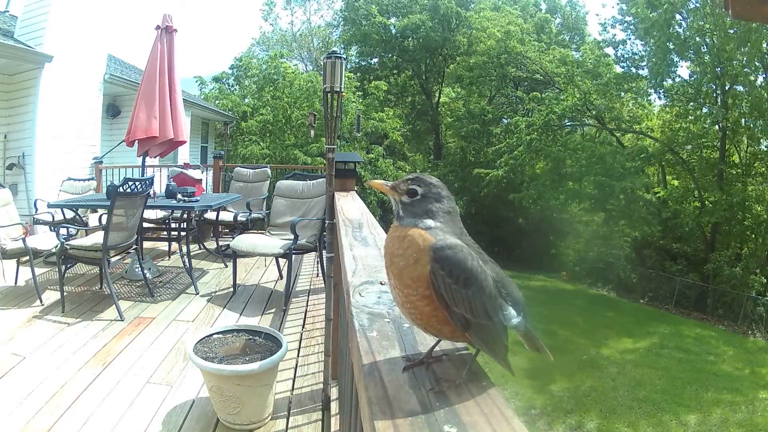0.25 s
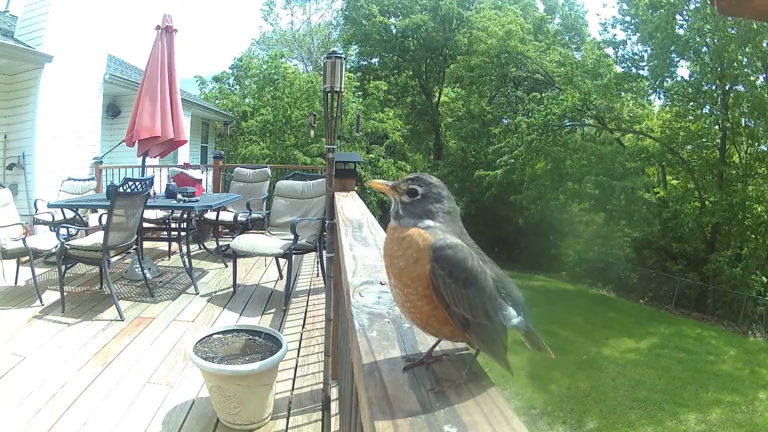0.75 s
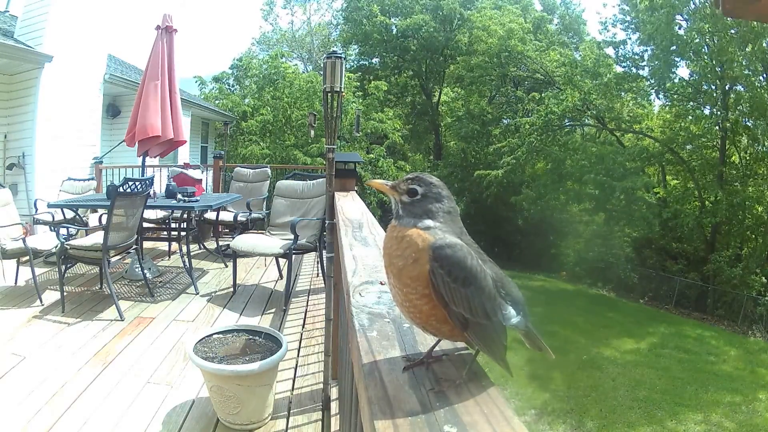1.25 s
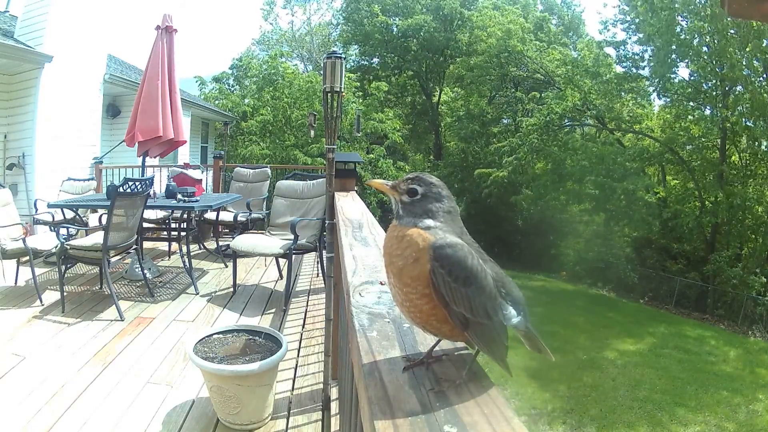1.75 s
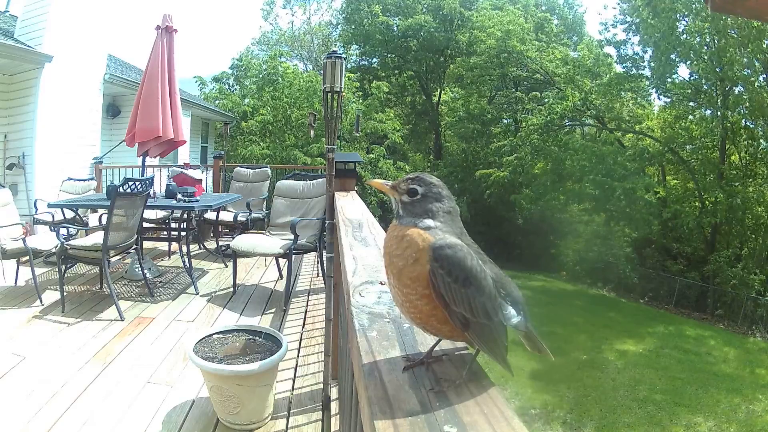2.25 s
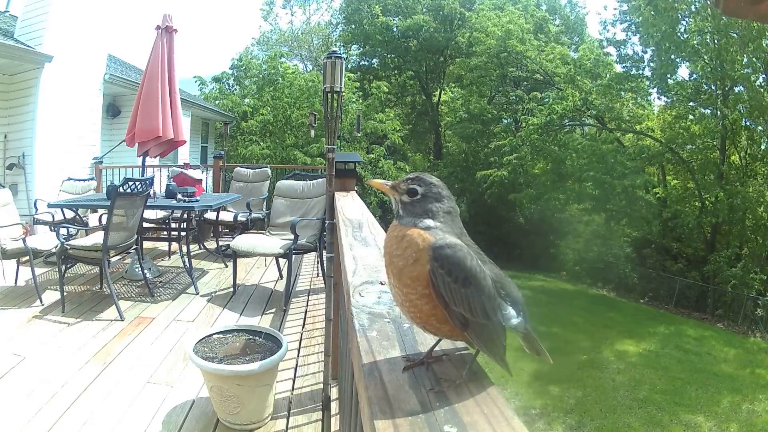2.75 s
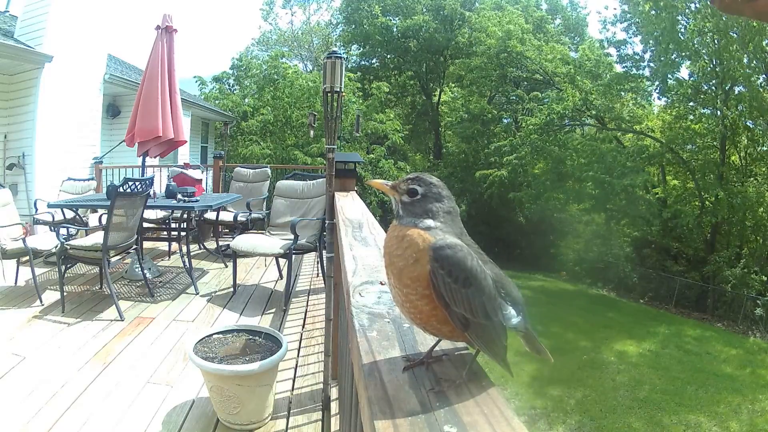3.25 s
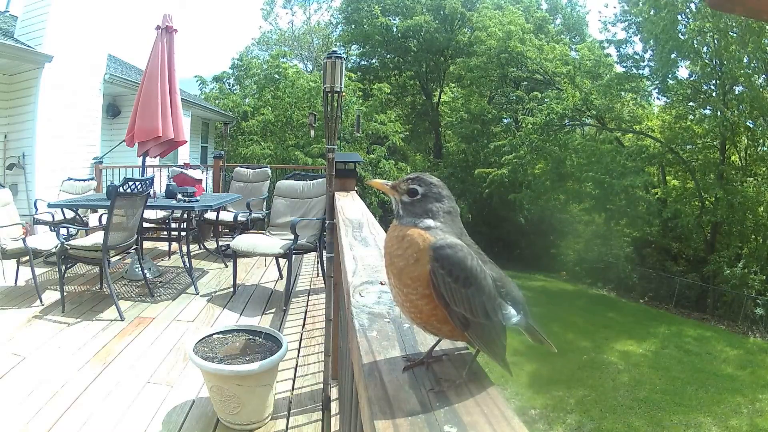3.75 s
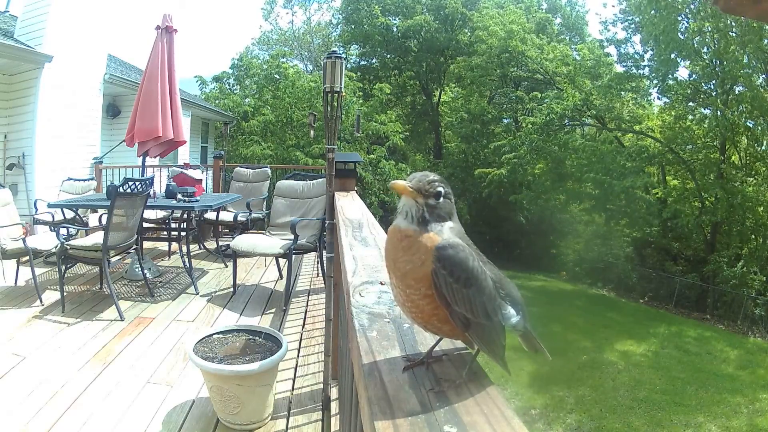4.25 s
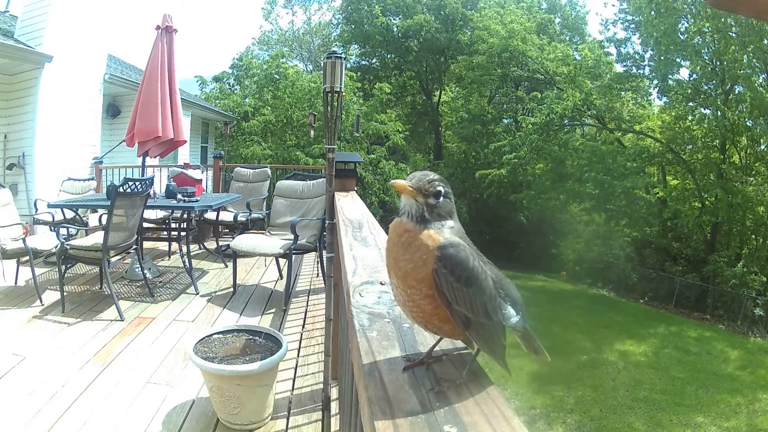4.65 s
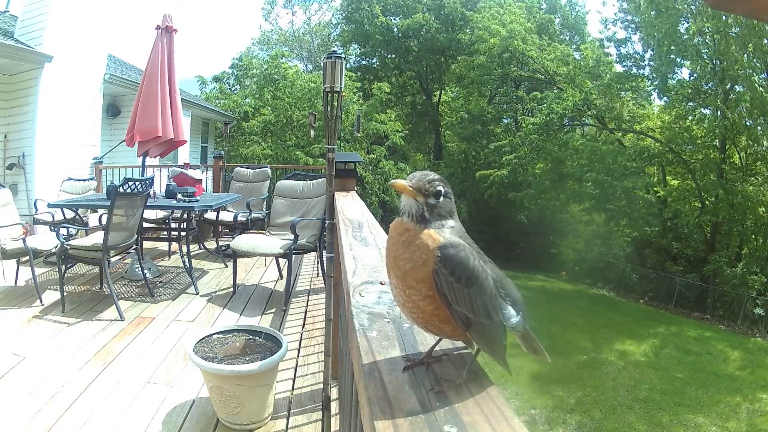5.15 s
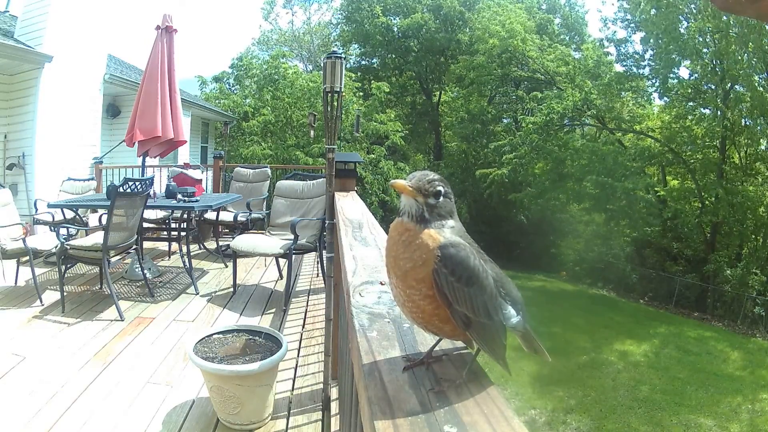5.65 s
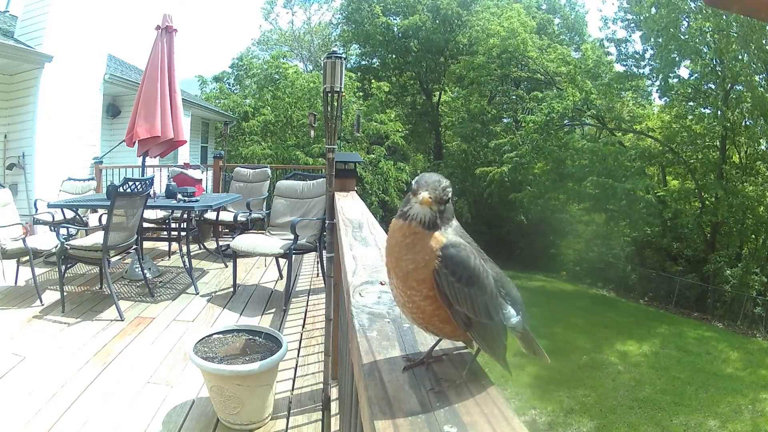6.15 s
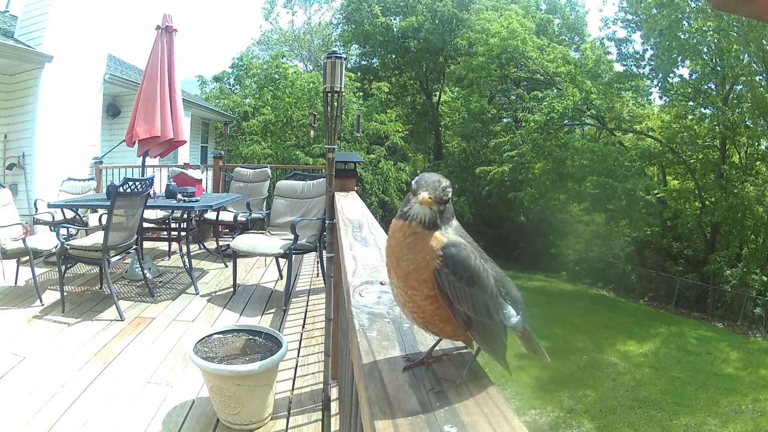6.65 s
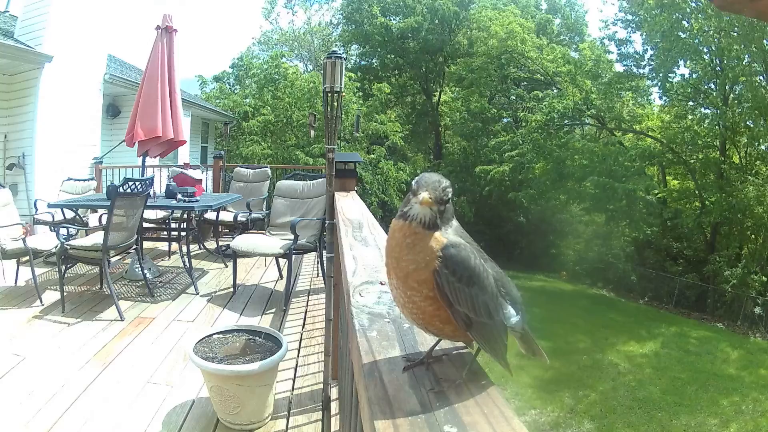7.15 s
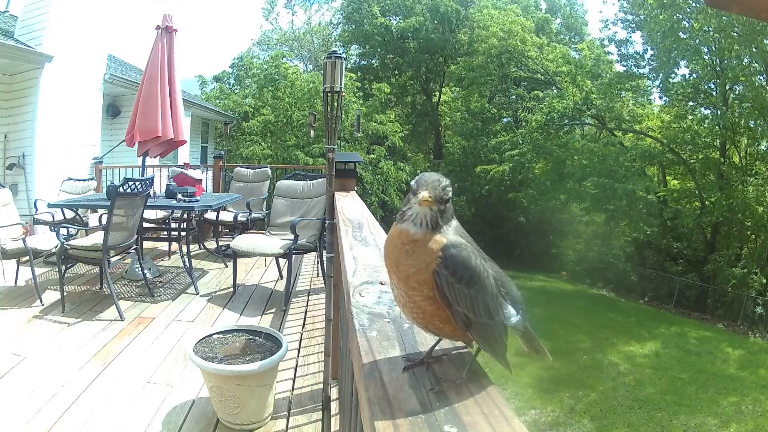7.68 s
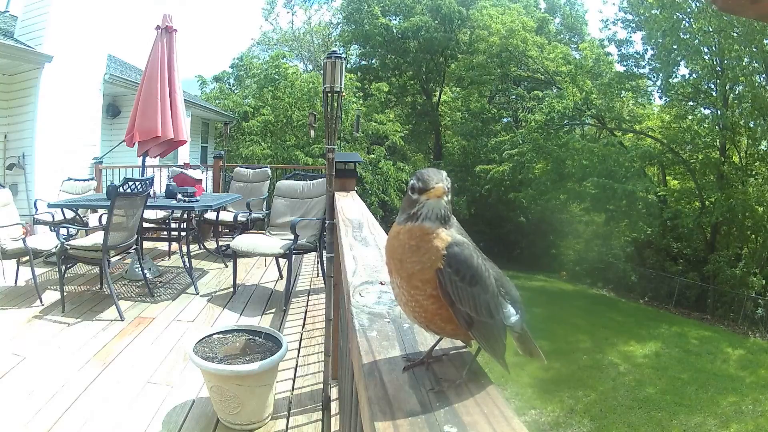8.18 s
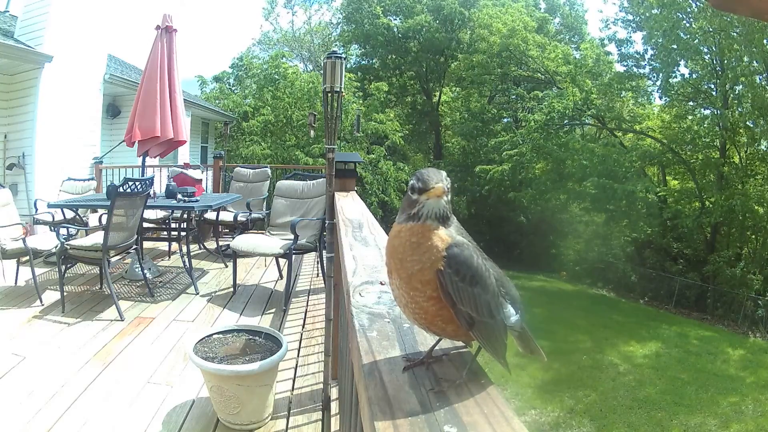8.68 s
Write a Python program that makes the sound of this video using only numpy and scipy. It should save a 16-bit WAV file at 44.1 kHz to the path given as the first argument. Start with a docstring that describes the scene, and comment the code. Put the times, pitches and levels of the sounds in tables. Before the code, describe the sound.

Outdoors on a wooden deck, a robin close to the microphone gives three brisk chirps, pauses about three seconds, gives three more, then a final three near the end. Low wind gusts rumble and thump on the microphone, mostly in the first three seconds, then subside. Behind lies a faint steady air conditioner hum with a slight buzz and soft leafy hiss.

```python
"""A robin on a deck rail, close to the microphone, calls three groups of three short chirps.
The two sides of its syrinx glide as separate sines and mix into difference, sum and octave tones.
The deck answers faintly; filtered noise makes the gusts and short pulses make the thumps on the microphone.
Behind it an air conditioner hums and buzzes and the garden hisses as shaped noise, over faint
tones: a distant drone, electrical tones that come and go, and a thin high whine."""
import sys
import numpy as np
from scipy import signal
from scipy.fft import rfft
from scipy.io import wavfile
from scipy.ndimage import uniform_filter1d

SR = 44100
rng = np.random.default_rng(int(sys.argv[2]) if len(sys.argv) > 2 else 0)


def persist_wave(psi):
    """Save psi, clipped to +-1, as 16-bit WAV."""
    counts = np.round(np.clip(psi, -1, 1) * 32767).astype(np.int16)
    wavfile.write(sys.argv[1], SR, np.atleast_2d(counts).T)


N = 393372
TIME = np.arange(N) / SR  # s

# chirps, levels ahead of throat and mix: [start t/s;
#   low side: length t/s, attack t/s, top f/Hz, last f/Hz, level/dB;
#   high side: length t/s, top f/Hz, level/dB, time to plunge t/s, f/Hz after plunge, closing flick f/Hz]
CHIRPS = [(.3742, .0456, .005, 1857, 970, -32.8, 0.073, 3020, -38, .0406, 1330, 650),
          (.6805, 0.049, .008, 1880, 992, -32.9, 0.056, 3260, -38.5, 0.041, 1426, 32),
          (.9758, 0.047, .008, 1824, 1090, -33.6, 0.073, 3214, -39, .0418, 1750, 100),
          (3.9374, 0.044, .007, 1762, 1020, -31.5, 0.071, 3065, -35.2, 0.043, 1265, 120),
          (4.1789, 0.052, .009, 1835, 1050, -28.8, 0.071, 3090, -35.9, 0.043, 1370, 80),
          (4.4116, .0452, .01, 2075, 1830, -29.4, .0678, 3337, -36.5, .0635, 1520, -100),
          (7.5702, .0477, .01, 1877, 950, -27.3, .0665, 3114, -33.5, .0425, 1290, -80),
          (7.8324, .0496, .009, 1841, 1025, -29.6, .0602, 3296, -33.5, .0443, 1143, 272),
          (8.0378, .0542, .017, 2340, 1220, -28.6, 0.049, 3454, -40.5, 0.048, 1410, -400)]
# soft peep trailing the sixth chirp, level ahead of throat and mix:
# [start t/s, length t/s, first f/Hz, last f/Hz, level/dB]
PEEPS = [(4.489, .0175, 1850, 1440, -41.5)]
# spectrum of the air noise in the bird's voice: [f/Hz, relative level/dB]
AIR_NOISE_SPECTRUM = [(1000, -22), (1800, 14), (2800, 8), (3700, 14), (4600, 0), (7000, -6), (10000, -4),
                      (11200, -1), (12400, -2), (13500, -3), (16000, -22)]
# reflections from rail and deck: [delay t/s, level/dB]
DECK_REFLECTIONS = [(.0031, -28), (.0074, -31), (.017, -18)]
# gusts on the microphone: [start t/s, length t/s, level/dB, small fast eddies relative to it, level/dB]
GUSTS = [(0.47, .145, -42.5, -7), (0.677, 0.19, -43, -9), (.94, .09, -45.5, -11),
         (1.118, 0.034, -46.5, -12), (1.197, 0.24, -50, -12), (1.284, 0.079, -44, -6),
         (1.52, 0.071, -47, -12), (2.018, .05, -46, -6), (2.068, .11, -39.5, -5), (2.263, .13, -44, -9),
         (2.4, .26, -45, -17), (2.812, .2, -45, -11), (3.27, .08, -53, -16), (4.391, 0.27, -52, -22)]
# light wind between the gusts, dying down overall: [t/s, level/dB]
LIGHT_WIND = [(0, -53), (1.5, -53), (1.85, -55.5), (2.3, -53), (3.2, -58), (4.1, -61.5), (4.7, -57),
              (5.4, -62), (8.92, -62)]
# spectrum of the buffeting: [f/Hz, relative level/dB]
BUFFET_SPECTRUM = [(12, -10), (25, -1), (50, -1), (80, -1), (130, -15.5), (190, -25), (300, -27.5),
                   (600, -53), (2000, -92)]
# single eddies that hit the microphone: [t/s, level/dB ahead of the thump trim, f/Hz]
THUMPS = [(.501, -24.5, 62), (1.353, -37, 100), (2.083, -28, 72.4), (2.124, -29.5, 95), (2.164, -31.5, 62),
          (2.279, -31, 91), (2.43, -34, 55), (2.836, -31.5, 56.05), (4.43, -44, 45), (4.521, -40, 54.6)]
# motor and fan tones of the air conditioner: [f/Hz, rms level/dB ahead of swell and waver]
MOTOR_TONES = [(290, -59.5), (307.4, -64), (439.9, -59), (469.6, -59), (498.1, -52), (555, -64.5),
               (747, -70.5), (939, -72.5), (998, -75.5), (1053, -67.5), (1185, -72.5), (1245, -63),
               (1437, -68.5), (1614, -77.5), (1690, -82), (2546, -84), (2676, -85), (2741, -80),
               (3736, -86), (4101, -84.5)]
# slow swell of the lower air conditioner tones: [t/s, level change/dB]
FAN_SWELL = [(0, 0), (.8, 0), (1.6, -1), (2.3, -2.5), (3.0, -0.5), (3.7, .5), (5.5, -.5), (7.5, 0.5),
             (8.92, 0)]
# spectrum of the casing buzz: [f/Hz, relative level/dB]
CASING_SPECTRUM = [(500, -8.5), (1200, 4), (2200, -8), (2700, -1), (3200, -11.5), (4200, -13), (5200, -15),
                   (6100, -15), (7500, -26)]
# spectrum of the steady garden air: [f/Hz, relative level/dB]
GARDEN_SPECTRUM = [(30, -30), (90, 3), (150, 4), (300, 0), (700, -1), (1250, -3.5), (1800, -10),
                   (2250, -14.5), (2800, -15), (3300, -24.5), (4300, -17.5), (5400, -28), (6200, -24.5),
                   (8500, -32.5), (15500, -34)]
# breeze in the trees: [t/s, level change/dB]
BREEZE = [(0, 2.5), (1.3, 1), (2.4, 1.5), (3.5, 0), (5.5, 0), (7, 0.36), (8.92, 0)]
# faint low drone that comes and goes: [t/s, f/Hz, level/dB, both ahead of flutter and wobble]
DRONE = [(0, 126.4, -50), (.27, 125, -48.5), (.4, 120, -86), (7.2, 88, -88), (7.6, 88.2, -60.5),
         (8.4, 90.4, -63), (8.92, 90.1, -55)]
# electrical tones that come and go: [start t/s, length t/s, f/Hz, rms level/dB ahead of flutter]
STRAY_TONES = [(0, 1.35, 1802, -67.5), (2.5, 4.2, 1802, -68), (1.7, 4.65, 2051, -75.5),
               (1.8, 2.3, 2740, -73.5), (0, 1.0, 1440, -66), (5.8, .75, 1440, -67)]

# attack and release of the high side, shared by chirps and peep
HIGH_ATTACK_S, HIGH_RELEASE_S = 0.0036, 0.0088


def robin(low_db=0.26, high_db=2.0, difference_db=3, knee_db=-39, octave_db=1, sum_db=12,
          rasp_db=-36, beak_hz=3750, throat_hz=900):
    """Both sides share one airflow, so each modulates the other; a trace of air noise rides on them."""
    low = whistle([low_note(*row[:6]) for row in CHIRPS])
    high_notes = [high_note(row[0], *row[6:]) for row in CHIRPS]
    high = whistle(high_notes + [peep_note(*row) for row in PEEPS])

    # the coupling saturates as the low side swells
    saturation = np.sqrt(abs(low) ** 2 + undb(knee_db) ** 2 / 4)
    coupled = high * np.conj(low) / saturation
    # the throat stops the difference tone once it sinks too low
    difference = undb(difference_db) * band(coupled.real, throat_hz, 4200, order=6)

    # octave and sum tone pass the beak only at the lower end of their glides
    octave = undb(octave_db) * low ** 2
    sum_tone = undb(sum_db) * low * high
    overtones = band((octave + sum_tone).real, 1600, beak_hz, order=6)

    breath = uniform_filter1d(abs(low), int(.012 * SR))
    rasp = undb(rasp_db) * breath * colour(noise(), AIR_NOISE_SPECTRUM)
    return undb(low_db) * low.real + undb(high_db) * high.real + difference + overtones + rasp


def whistle(notes, shimmer_db=0.45, jitter=.003):
    """One side of the syrinx: a sine glides through each note, shaped by the throat, as a rotating phasor."""
    hz, size = np.zeros(N), np.zeros(N)
    for start_s, pitch, strength in notes:
        span = int(start_s * SR) + np.arange(len(pitch))
        hz[span] = pitch
        size[span] = strength * throat(pitch)
    level = size * undb(shimmer_db * walk(500))
    turns = np.cumsum(hz * (1 + jitter * walk(400))) / SR  # jitter is a share of the pitch
    return level * np.exp(2j * np.pi * turns)


def low_note(start_s, length_s, attack_s, top_hz, last_hz, db,
             scoop=.307, scoop_s=.0024, sag=.179, drop_power=5.5, release_s=.0048):
    """Low side of the syrinx: scoops up into a shallow arch, then drops to its last pitch."""
    t = TIME[TIME < length_s]
    done = t / length_s
    # scoop and sag are shares of the top pitch
    arch = top_hz * (1 - scoop * np.exp(-t / scoop_s) - sag * done ** 2)
    hz = arch + (last_hz - arch) * done ** drop_power
    return start_s, hz, undb(db) * envelope(t, length_s, attack_s, release_s)


def high_note(start_s, length_s, top_hz, db, plunge_at_s, trough_hz, flick_hz,
              scoop=.416, scoop_s=.004, sag_per_s=2.07, plunge_s=.0052, flick_s=0.01996,
              swell_db_per_s=74, fade_db_per_s=300):
    """High side: scoops into a tall arch, pushes hardest at its plunge and fades with a small flick."""
    t = TIME[TIME < length_s]
    late = t - plunge_at_s
    arch = top_hz * (1 - scoop * np.exp(-t / scoop_s) - sag_per_s * t)
    hz = trough_hz + (arch - trough_hz) / (1 + np.exp(late / plunge_s))
    hz = hz + flick_hz * np.clip(1 - (length_s - t) / flick_s, 0, 1) ** 2
    effort_db = np.minimum(swell_db_per_s * late, -fade_db_per_s * late)
    return start_s, hz, undb(db + effort_db) * envelope(t, length_s, HIGH_ATTACK_S, HIGH_RELEASE_S)


def peep_note(start_s, length_s, first_hz, last_hz, db, settle_s=.003):
    """The high side alone, sliding down and settling."""
    t = TIME[TIME < length_s]
    hz = last_hz + (first_hz - last_hz) * np.exp(-t / settle_s)
    return start_s, hz, undb(db) * envelope(t, length_s, HIGH_ATTACK_S, HIGH_RELEASE_S)


def throat(hz, centre_hz=1342, width_oct=0.23, peak_db=6, tilt_db_per_oct=-6):
    """Gain of the throat: one resonance on a slope that falls towards the treble."""
    octaves = np.log2(np.maximum(hz, 1) / centre_hz)
    return undb(tilt_db_per_oct * octaves + peak_db / (1 + (octaves / width_oct) ** 2))


def envelope(t, length_s, attack_s, release_s):
    """A note builds up, holds and is rounded off at its end."""
    build_up = 1 - np.exp(-t / attack_s)
    return build_up * np.sin(np.pi / 2 * np.clip((length_s - t) / release_s, 0, 1))


def deck(x, t60_s=0.18, scatter_db=-25):
    """Boards answer at once; furniture, house wall and trees scatter a short faint tail."""
    t = TIME[:SR // 2]
    tail = rng.standard_normal(len(t)) * undb(-60 * t / t60_s)
    response = undb(scatter_db) * tail / np.linalg.norm(tail)
    for delay_s, db in DECK_REFLECTIONS:
        response[int(delay_s * SR)] += undb(db)
    return x + signal.fftconvolve(x, response)[:N]


def wind(attack_s=0.014, release_s=0.021, eddy_s=0.045, calm_small_db=-17, uneven_db=1.6):
    """Gusts on the microphone rise, hold and die away over a light wind; some shed many small, fast eddies."""
    # powers of the large and the small eddies
    large = undb(curve(LIGHT_WIND, 1)) ** 2
    small = large * undb(calm_small_db) ** 2
    for start_s, length_s, db, small_db in GUSTS:
        t = TIME - start_s
        rise = np.clip(t / attack_s, 0, 1)
        force = undb(db) * rise * np.exp(-np.maximum(t - length_s, 0) / release_s)
        large = large + force ** 2
        small = small + (force * undb(small_db)) ** 2
    eddies = colour(noise(), BUFFET_SPECTRUM)
    # even out the level so that the gusts alone shape it
    eddies = eddies / np.sqrt(uniform_filter1d(eddies ** 2, int(eddy_s * SR)))
    flutter = unit(band(noise(), 79, 164.5, order=3))
    return undb(uneven_db * walk(30)) * (np.sqrt(large) * eddies + np.sqrt(small) * flutter)


def thumps(trim_db=-1, cycles=0.54):
    """A large eddy pushes and pulls the diaphragm for about one cycle."""
    out = np.zeros(N)
    for (hit_s, db, hz), turn in zip(THUMPS, rng.random(len(THUMPS))):
        phase = (TIME - hit_s) * hz
        pulse = np.exp(-(phase / cycles) ** 2) * np.cos(2 * np.pi * (phase + turn))
        out += undb(db + trim_db) * pulse
    return out


def air_conditioner(waver_db=1.0, drift_hz=0.35, fan_top_hz=600, compressor_hz=58.14,
                    buzz_db=-64, buzz_waver_db=1.3):
    """Motor and fan tones waver a little; each compressor stroke shakes the casing."""
    hum, swell_db = 0, curve(FAN_SWELL, 1)
    for hz, db in MOTOR_TONES:
        turns = np.cumsum(hz + drift_hz * walk(4)) / SR + rng.random()
        level_db = db + waver_db * walk(2.983) + swell_db * (hz < fan_top_hz)
        hum = hum + np.sqrt(2) * undb(level_db) * np.sin(2 * np.pi * turns)
    strokes = np.cumsum(compressor_hz * (1 + 0.000301 * walk(2))) / SR
    rattle = rng.standard_normal(int(SR / compressor_hz))  # the same rattle on every turn
    shaking = np.interp(strokes % 1, np.linspace(0, 1, len(rattle)), rattle)
    buzz = colour(shaking, CASING_SPECTRUM)
    return hum + undb(buzz_db + buzz_waver_db * walk(2.04)) * buzz


def garden(air_db=-53, swell_db=0.58):
    """Leaves and distant town as an even hiss that lifts with the breeze."""
    level_db = air_db + curve(BREEZE, 1) + swell_db * walk(2.03)
    return colour(noise(), GARDEN_SPECTRUM) * undb(level_db)


def drone(flutter_db=2, wobble_hz=3):
    """A distant low tone, unsteady in level and pitch."""
    turns = np.cumsum(curve(DRONE, 1) + wobble_hz * walk(20)) / SR
    return undb(curve(DRONE, 2) + flutter_db * walk(22)) * np.sin(2 * np.pi * turns)


def stray_tones(fade_s=0.077, flutter_db=1.5):
    """Faint electrical tones of fixed pitch fade in, hold with a slight flutter and fade out."""
    out = np.zeros(N)
    for start_s, length_s, hz, db in STRAY_TONES:
        gate = envelope(np.maximum(TIME - start_s, 0), length_s, fade_s, fade_s)
        level = np.sqrt(2) * undb(db + flutter_db * walk(8))
        out += gate * level * np.sin(2 * np.pi * hz * TIME)
    return out


def whine(centre_hz=13120, split_hz=40, whine_db=-91.0, fuzz_db=-89):
    """A thin high electronic whine: two close tones, split_hz either side of centre, in a narrow fuzz."""
    pair = 2 * np.sin(2 * np.pi * centre_hz * TIME) * np.cos(2 * np.pi * split_hz * TIME)
    fuzz = unit(band(noise(), centre_hz - 130, centre_hz + 130, order=1))
    return undb(whine_db) * pair + undb(fuzz_db) * fuzz


def undb(db):
    """Decibels to gain."""
    return 10 ** (np.asarray(db) / 20)


def unit(x):
    """Scale to rms 1."""
    return x / np.sqrt(np.mean(x ** 2))


def curve(table, column):
    """One column of a timed table, joined by straight lines."""
    rows = np.array(table)
    return np.interp(TIME, np.sort(rows[:, 0]), rows[:, column])


def colour(x, points):
    """Filter by a spectrum of f/Hz and level/dB, joined along log frequency; the result has rms 1."""
    hz, db = np.transpose(points)
    bins_hz = np.maximum(np.arange(N // 2 + 1) * SR / N, 1)
    gain = undb(np.interp(np.log(bins_hz), np.log(np.sort(hz)), db))
    return unit(np.fft.irfft(rfft(x) * gain, N))


def band(x, low_hz, high_hz, order=2):
    """Butterworth band-pass."""
    edges_hz = [low_hz, min(high_hz, SR / 2 - 1)]
    return signal.sosfilt(signal.butter(order, edges_hz, "band", fs=SR, output="sos"), x)


def noise():
    """White noise."""
    return rng.standard_normal(N)


def walk(rate):
    """Random levels held for 1 / rate s and smoothed twice over that time; rms 1."""
    hold = int(SR / rate)
    steps = np.repeat(rng.standard_normal(N // hold + 1), hold)
    return unit(uniform_filter1d(uniform_filter1d(steps, hold), hold)[:N])


def scene():
    """Bird, wind and background at one microphone."""
    near = deck(robin()) + wind() + thumps()
    return (near + air_conditioner() + garden() + drone() + stray_tones() + whine())[None]


def record(dry, top_hz=15700):
    """The recorder cuts the top with a steep elliptic low-pass."""
    low_pass = signal.ellip(10, .1, 70, top_hz, fs=SR, output="sos")  # 0.1 dB ripple, 70 dB stop
    return signal.sosfilt(low_pass, dry)


dry = scene()
out = record(dry)
persist_wave(out)
```